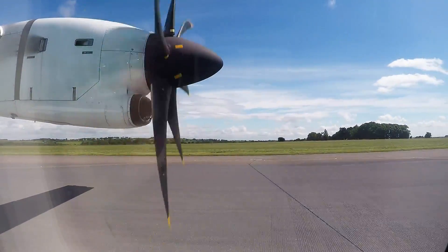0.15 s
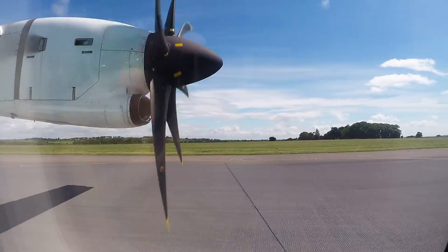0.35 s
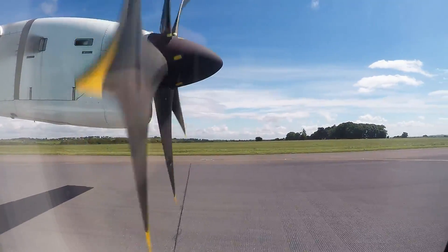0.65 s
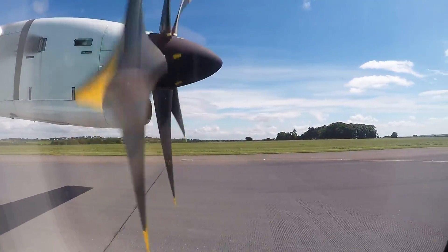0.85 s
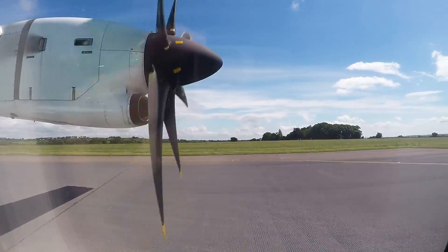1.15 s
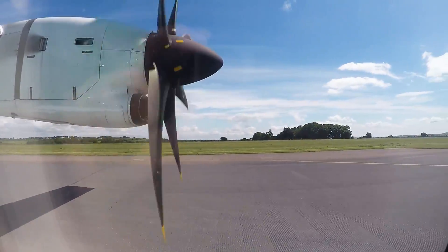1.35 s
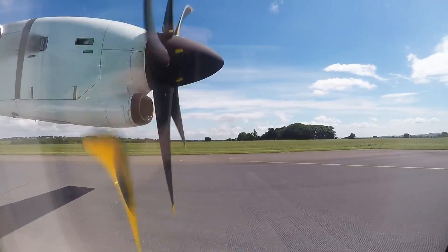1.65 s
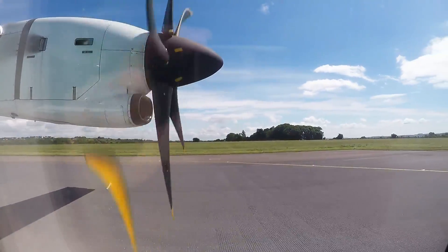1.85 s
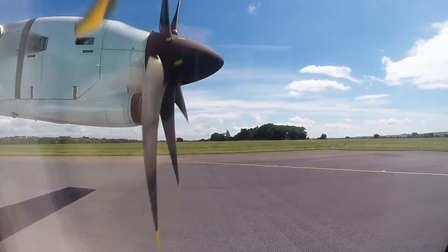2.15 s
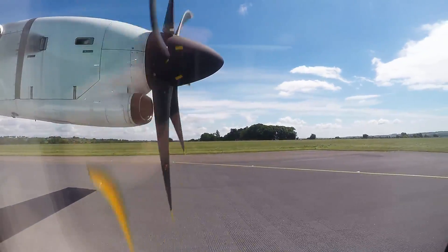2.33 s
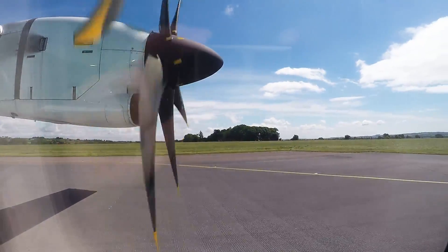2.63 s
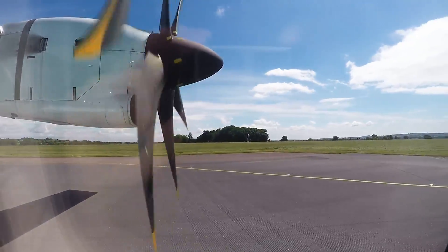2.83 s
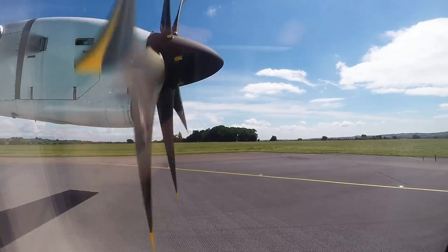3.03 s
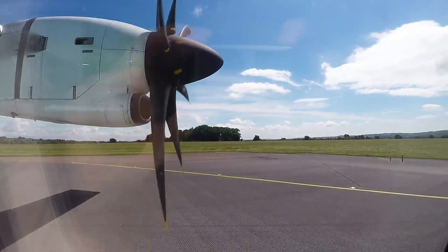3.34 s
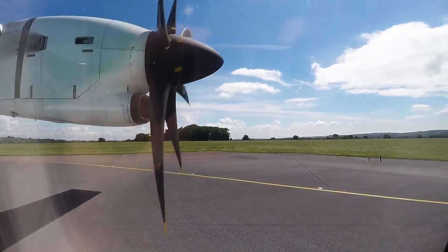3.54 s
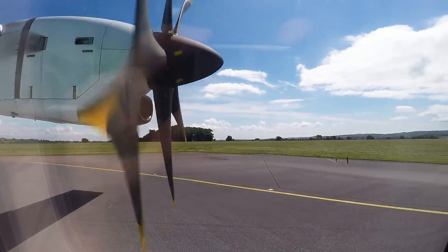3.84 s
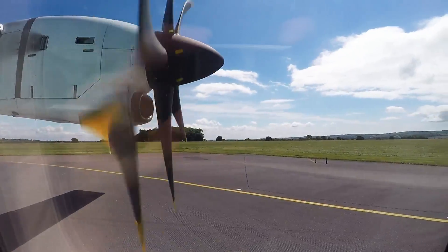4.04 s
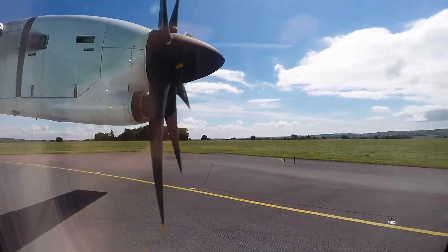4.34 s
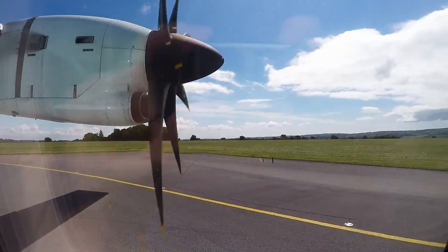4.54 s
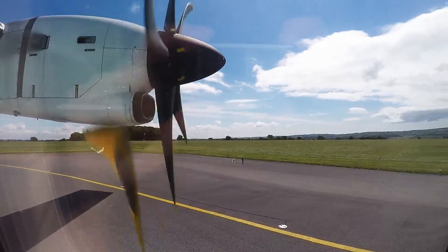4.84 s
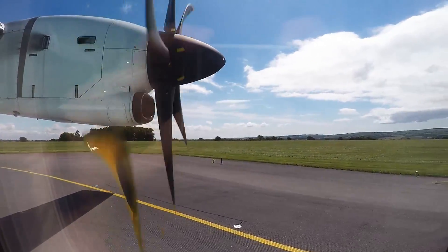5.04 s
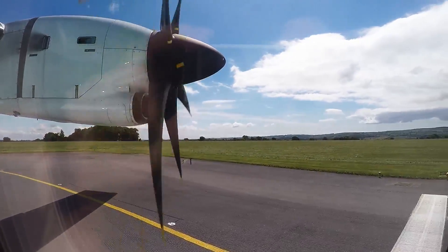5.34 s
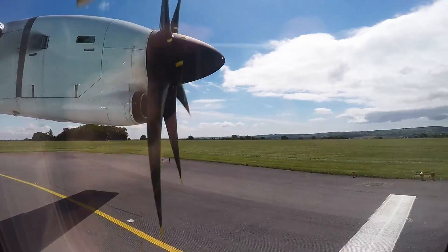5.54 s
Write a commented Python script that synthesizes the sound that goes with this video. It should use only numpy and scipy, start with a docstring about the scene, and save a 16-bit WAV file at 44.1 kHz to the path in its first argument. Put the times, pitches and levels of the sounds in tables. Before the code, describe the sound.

For about 5.7 seconds, the inside of a taxiing turboprop cabin is filled by a loud, continuous, bass-heavy drone. A nearly pure low hum sits under deep boom that surges and drops in irregular quick pulses, while a slightly higher drone wavers in pitch and strength. Propeller blade tones blend in, swelling and blurring. Muffled prop wash roars in the low mids with soft, much quieter air hiss above; it swells around 1.2 s, sags around 1.4 to 1.7 s, then recovers, rising slightly toward the end. A very faint thin turbine whine is almost buried. At about 0.44 s a crisp, ringing little rattle clicks close to the microphone, with a lighter tick at 0.5 s. Weaker ticks and rustles follow near 1.0, 1.3, 1.6, 2.55, 3.3, 3.6, 4.5 and 5.3 s. The sound is mono, enclosed and lightly overloaded, with the engine never stopping.

```python
"""Turboprop cabin at taxi power

Heard beside the six-blade propeller: prop wash booms in the cabin modes, as noise through resonant spectra.
Blade tones and a wavering drone are sines on drifting pitch and level curves, over a steady low hum.
The turbine whines faintly in the air hiss, as two flickering sine lines.
Something light ticks and rustles near the microphone, as short grainy bursts that ring."""
import sys
import numpy as np
from scipy import signal
from scipy.fft import rfft, irfft
from scipy.io import wavfile
from scipy.ndimage import uniform_filter1d

SR = 44100
rng = np.random.default_rng(int(sys.argv[2]) if len(sys.argv) > 2 else 0)


def unload_audio(sound):
    """Save the sound as a 16-bit wav file, at the path given as the first command line argument."""
    columns = np.transpose(np.atleast_2d(sound))
    # keep every value between -1 and 1, then stretch to whole-number steps
    steps = np.round(np.clip(columns, -1, 1) * 32767)
    wavfile.write(sys.argv[1], SR, steps.astype(np.int16))


N = 250488


def gain_of(db):
    """Amplitude factor for a level in dB."""
    return 10 ** (np.asarray(db) / 20)


def evened(x):
    """Scaled to rms 1."""
    return x / np.sqrt(np.mean(x ** 2) + 1e-20)


def add(mix, start_s, sound):
    """Mix a sound in at start_s, cut at the end of the mix."""
    part = mix[round(start_s * SR):][:len(sound)]
    part += sound[:len(part)]


def wander(top_hz, span=20):
    """Random drift of rms 1: sines from top_hz / span to top_hz, weaker with frequency."""
    t = np.arange(0, N / SR + .02, .005)
    drift = 0
    for hz in top_hz * np.geomspace(1 / span, 1, num=24):
        drift = drift + np.sin(2 * np.pi * (hz * t + rng.random())) / np.sqrt(hz)
    return np.interp(np.arange(N) / SR, t, evened(drift))


def coloured(points, modes, size=N, tilt_db=0):
    """Noise of rms 1 under a spectral outline, with resonant bumps and dips; tilt in dB per octave."""
    hz = np.fft.rfftfreq(size, 1 / SR)
    point_hz, point_db = np.transpose(points)
    power = np.ones(len(hz))
    for mode_hz, width_hz, over_db in modes:
        power += (gain_of(over_db) ** 2 - 1) / (1 + (2 * (hz - mode_hz) / width_hz) ** 2)
    tilted_db = point_db + tilt_db * np.log2(point_hz)
    outline_db = np.interp(np.log(hz + 1), np.log(point_hz + 1), tilted_db, left=-300, right=-300)
    response = gain_of(outline_db) * np.sqrt(np.maximum(power, .01))
    return evened(irfft(rfft(rng.standard_normal(size)) * response, size))


def curve(rows, column):
    """One table column interpolated over time."""
    rows = np.array(rows)
    return np.interp(np.arange(N) / SR, rows[:, 0], rows[:, column])


def tone(hz, rms_db):
    """A sine whose phase integrates a pitch curve, under a level curve."""
    phase = np.cumsum(hz) / SR + rng.random()
    return gain_of(rms_db) * np.sqrt(2) * np.sin(2 * np.pi * phase)


# noise outlines, relative: freq_hz, density_db_per_hz
ROAR_OUTLINE = [(140, -32), (190, -5), (215, 0.5), (258, -3.5), (272, -10), (410, -11), (450, -16),
                (700, -19.5), (1200, -26), (1500, -35.5), (2000, -57)]
HISS_OUTLINE = [(710, -26), (1200, -2), (1360, -3), (1780, -6), (2120, -9), (2680, -8.5), (3240, -13.5),
                (4270, -17), (5110, -24), (5570, -23), (7490, -31.5), (12800, -37.5), (15000, -48.5)]
# cabin and panel modes: mode_hz, width_hz, over_noise_db
ROAR_MODES = [(200.5, 15, 0.5), (240, 10, -4), (237.5, 3.7, 4.5), (258, 5.3, 5.5), (302, 7, 1.5),
              (270, 4.3, -4), (318, 13, 3), (338, 9.4, 6.5), (353, 4.2, 1), (411, 55, 2.5), (488, 37, 4),
              (597, 58, 4), (818, 11, 4.5), (911, 42, 3.5), (1167, 44, 4.5)]
HISS_MODES = [(1977, 52, 5), (2188, 140, 5.5), (2648, 48, 5), (3010, 48, 4.9), (3410, 50, 2.8),
              (4660, 270, 2.7), (5450, 83, 5)]
# swell of the prop wash: time_s, swell_db
WASH_SWELL = [(0.0, 1.5), (0.7, 0), (1.2, 3), (1.42, -1.5), (1.7, -2.5), (1.95, 0.5), (3.1, -0.5), (3.6, 0),
              (4.25, 0.3), (4.85, 1.4), (5.68, 1.5)]
ROAR_RMS_DB, HISS_RMS_DB = -25.5, -41.5  # at 0 dB swell
ROAR_DB_PER_SWELL_DB, HISS_DB_PER_SWELL_DB = 0.93, 0.7


def wash():
    """Turbulent air as noise ringing cabin modes: roar and hiss follow one swell and flutter slightly."""
    swell_db = curve(WASH_SWELL, column=1)
    roar_db = ROAR_RMS_DB + ROAR_DB_PER_SWELL_DB * swell_db + .5 * wander(5.9)
    roar = gain_of(roar_db) * coloured(ROAR_OUTLINE, ROAR_MODES)
    hiss_db = HISS_RMS_DB + HISS_DB_PER_SWELL_DB * swell_db + 0.43 * wander(30.)
    hiss = gain_of(hiss_db) * coloured(HISS_OUTLINE, HISS_MODES)
    return roar + hiss


# blade tones of lasting level: multiple, rms_db
BLADE_TONES = [(1, -25), (2, -32), (4, -43)]
# blade tones that come and go: time_s, third_rms_db, fifth_rms_db
OVERTONES = [(0, -28, -33), (.15, -28, -36), (.35, -30, -32.5), (.6, -34, -33), (.88, -36, -33.5),
             (1.0, -37, -39), (1.22, -32, -35), (1.4, -34, -44), (1.75, -31.5, -46), (2.1, -34, -48),
             (2.4, -39, -48), (3.3, -36, -46), (4.1, -39, -46), (4.35, -33, -39), (4.7, -31.5, -42),
             (5.0, -34, -44), (5.2, -33, -35), (5.5, -35, -36), (5.68, -35, -38)]
BLADE_HZ = 84.8  # mean blade-pass rate, six per turn


def propeller():
    """Multiples of a slightly wandering blade-pass rate, each swelling and blurring as the loading shifts."""
    blade_hz = BLADE_HZ * (1 + 0.0025 * wander(1.5))
    tones = np.zeros(N)
    for multiple, rms_db in BLADE_TONES:
        tones += tone(multiple * (blade_hz + 0.4 * wander(6.)), rms_db + 3.2 * wander(5.4))
    third_hz = 3 * blade_hz + 2.5 * wander(8.)
    third = tone(third_hz, curve(OVERTONES, column=1) + 3 * wander(12., span=6))
    fifth_hz = 5 * blade_hz + 1.8 * wander(10.)
    fifth = tone(fifth_hz, curve(OVERTONES, column=2) + 2.8 * wander(14., span=6))
    return tones + third + fifth


# boom outline, relative: freq_hz, density_db_per_hz
BOOM_OUTLINE = [(12, -48.5), (24, -9.5), (40, -6.5), (60, -6), (90, -11), (101, -7), (112, -4.5),
                (140, -13), (150, -13), (190, -22.5), (230, -47)]
# cabin modes: mode_hz, width_hz, over_noise_db
BOOM_MODES = [(41.6, 3, 1.5), (63.6, 14, 6.5), (107, 7.7, -8.5), (108.5, 11, 5.5), (121, 15, -7),
              (142, 11, 5.5), (184, 20, 6)]
# boom and hum together: time_s, rms_db
RUMBLE_LEVEL = [(0.0, -16), (0.16, -12.5), (0.19, -24), (0.22, -15.5), (1.27, -14), (1.3, -10.5),
                (1.44, -18), (1.52, -13.5), (1.57, -23), (1.6, -21), (2.02, -15), (2.06, -27), (2.15, -9),
                (2.2, -22), (2.24, -17), (3.07, -15.5), (3.08, -36), (3.13, -17.5), (3.46, -13),
                (3.51, -19), (3.69, -12), (3.73, -23), (3.86, -12.5), (4.0, -22), (4.03, -17), (4.4, -18.5),
                (4.49, -10.5), (4.51, -17.5), (5.11, -16), (5.68, -17)]
# strongest cabin drone: time_s, pitch_hz, rms_db
DRONE = [(0.0, 136, -14), (0.08, 130.6, -38), (0.11, 122.3, -15), (0.24, 127, -17.5), (0.43, 132.4, -18.5),
         (0.49, 127.4, -14), (0.58, 126.5, -37), (0.6, 124.4, -16), (0.79, 124.8, -23), (0.88, 119.2, -19),
         (0.96, 128.6, -15.5), (1.11, 130.5, -18.5), (1.23, 129.2, -13), (1.28, 125.4, -25.5),
         (1.37, 128.4, -15), (1.41, 126, -25), (1.45, 126.5, -18), (1.61, 125.1, -25.5), (1.66, 127.6, -9),
         (1.79, 129.1, -42), (1.8, 127.1, -8), (1.87, 128.3, -28), (1.94, 126, -9), (2.06, 122.8, -27.5),
         (2.14, 132.2, -34), (2.18, 130.2, -12), (2.36, 130, -19.5), (2.4, 126.5, -14),
         (2.55, 119.4, -30.5), (2.59, 121.7, -9), (2.66, 125.9, -23), (2.69, 125.8, -14.5),
         (2.74, 128.4, -21), (2.97, 128.4, -16.5), (2.99, 130.8, -27), (3.08, 129.9, -16),
         (3.15, 128.8, -23), (3.18, 122.2, -11.5), (3.24, 123, -16), (3.34, 130.2, -21), (3.39, 128.7, -12),
         (3.45, 130.5, -17), (3.56, 126.1, -12.5), (3.57, 126.7, -30.5), (3.65, 127.3, -17.5),
         (3.86, 126.7, -21), (3.94, 125.5, -12), (3.99, 125, -29.5), (4.02, 124, -10), (4.06, 126.7, -24.5),
         (4.35, 130.7, -14), (4.6, 116.9, -23.5), (4.68, 129.6, -13.5), (4.78, 129, -15),
         (4.86, 125.2, -14.5), (5.19, 126.6, -23), (5.35, 132.1, -17.5), (5.38, 132.5, -29.5),
         (5.44, 128.2, -12.5), (5.68, 128.6, -19)]
HUM_HZ, HUM_RE_BOOM_DB = 50.45, -6


def hum():
    """Surging boom noise holding a nearly pure low tone, under a drone wavering in pitch and level."""
    low_tone = tone(HUM_HZ * (1 + 0.0021 * wander(1.4)), HUM_RE_BOOM_DB + 0.87 * wander(1.5))
    boom = coloured(BOOM_OUTLINE, BOOM_MODES)
    rumble = gain_of(curve(RUMBLE_LEVEL, column=1)) * evened(boom + low_tone)
    drone_hz = curve(DRONE, column=1) + 0.8 * wander(13.0, span=2.9)
    drone = tone(drone_hz, curve(DRONE, column=2) + 1.7 * wander(20.0, span=2.9))
    return rumble + drone


# turbine whine: time_s, pitch_hz, rms_db
WHINE = [(0, 4140, -70), (.6, 4138, -66), (2.3, 4140, -66), (2.7, 4185, -71), (4.2, 4195, -70),
         (4.6, 4150, -75), (5.2, 4090, -72), (5.68, 4085, -69)]
HIGH_WHINE_HZ, HIGH_WHINE_RMS_DB = 8310, -82


def turbine():
    """A thin line that shifts slowly and flickers, and a fainter, fuzzier one above."""
    whine_hz = curve(WHINE, column=1) + 3 * wander(15.)
    whine = tone(whine_hz, curve(WHINE, column=2) + 2.5 * wander(20., span=6))
    high_hz = HIGH_WHINE_HZ + 10 * wander(15.)
    return whine + tone(high_hz, HIGH_WHINE_RMS_DB + 2.5 * wander(9.))


# ticks and rustles: start_s, level_db, t60_s, tilt_db_per_octave, ringing (0-1), top_hz
TICKS = [(0.4405, -28, 0.035, -7, .6, 5000), (0.4420, -33, 0.13, 2.5, .5, 15000),
         (0.4430, -25, 0.035, -4, 0.8, 15000), (0.4463, -25.5, 0.03, -2, .8, 15000),
         (0.4492, -26, 0.035, -5, .8, 12000), (0.4540, -27.5, 0.045, -3, 0.6, 15000),
         (0.4608, -33, 0.05, -3, .5, 15000), (.5138, -36, 0.03, -.5, 0.3, 15000),
         (.5185, -41, 0.06, 1, 0.3, 15000), (1.0163, -40.5, .04, 1, .25, 15000),
         (1.0213, -44, 0.068, 3, .4, 15000), (1.172, -50, .12, 3, .2, 13500),
         (1.314, -32.5, .05, -7, 0.2, 9000), (1.333, -40, .05, -1.5, 0.1, 12000),
         (1.604, -41.5, .07, -0.5, .25, 14000), (1.61, -42, .08, 2, .25, 14000),
         (1.6191, -45, .09, 2, 0.3, 14000), (1.641, -48, .09, 0.5, .25, 14000),
         (2.5525, -31, .03, -9, .25, 5000), (2.775, -54, 0.12, 3, .4, 10000),
         (3.125, -54, .14, 3, .4, 10000), (3.34, -43, 0.047, -0.5, 0.2, 15000),
         (3.567, -37, 0.073, -5, 0.24, 8000), (3.8886, -47, 0.035, 4, .25, 11500),
         (4.4893, -44, .05, -2, 0.22, 8500), (4.657, -45, 0.044, 0.5, 0.3, 10500),
         (5.3097, -33, 0.048, -3.5, 0.22, 12000)]
# modes of the small object: mode_hz, width_hz, over_noise_db (at full ringing)
TICK_MODES = [(700, 120, 10), (1350, 150, 7), (1880, 120, 11), (2770, 120, 11), (3120, 100, 10),
              (4530, 80, 5), (5690, 80, 6), (7475, 90, 12), (9230, 70, 8), (10500, 90, 5), (11250, 80, 6),
              (11680, 90, 4), (14200, 80, 5)]
# burst outline before tilt, relative: freq_hz, density_db_per_hz
TICK_OUTLINE = [(400, -15), (800, 8), (1500, 1), (3000, 3.5), (5000, -2.5), (8000, -12.5), (12000, -14),
                (15500, -19.5)]
RISE_T60S, HOLD_T60S = 0.015, 0.07  # rise and contact times as shares of t60_s
CONTACTS_PER_S, GRAIN_DB = 900, 3
RING_DB, RING_T60_S = -23, 0.06  # free ringing, before mode levels and ringing
RING_TILT_DB_PER_OCTAVE = -14  # above the strongest mode


def ticks():
    """Bursts of tiny random contacts as grainy noise, ringing the same small object more or less."""
    out = np.zeros(N)
    t = np.arange(8192) / SR
    strongest_hz = max(TICK_MODES, key=lambda mode: mode[-1])[0]
    for start_s, level_db, t60_s, tilt_db, ringing, top_hz in TICKS:
        rise = np.minimum(t / (RISE_T60S * t60_s), 1)
        decay = gain_of(-60 * np.maximum(t / t60_s - HOLD_T60S, 0))

        contacts = (rng.random(len(t)) < CONTACTS_PER_S / SR) * rng.exponential(1, len(t))
        bumps = signal.lfilter([1], [1, -np.exp(-CONTACTS_PER_S * 2 / SR)], contacts)
        crackle = gain_of(GRAIN_DB * np.clip(evened(bumps) - 1, -1, 2))

        modes = [(hz, width_hz, over_db * ringing) for hz, width_hz, over_db in TICK_MODES]
        noise = coloured(TICK_OUTLINE, modes, size=len(t), tilt_db=tilt_db)
        lowpass = signal.butter(3, top_hz, fs=SR, output="sos")
        burst = signal.sosfilt(lowpass, rise * decay * crackle * noise)

        ring = np.zeros(len(t))
        for hz, _, over_db in TICK_MODES:
            octaves_above = max(np.log2(hz / strongest_hz), 0)
            mode_gain = gain_of(over_db + RING_TILT_DB_PER_OCTAVE * octaves_above)
            ring += mode_gain * np.sin(2 * np.pi * (hz * t + rng.random()))
        ring *= ringing ** 2 * rise * gain_of(RING_DB - 60 * t / RING_T60_S)
        add(out, start_s, gain_of(level_db) * (burst + ring))
    return out


def scene():
    """All sources summed to one channel."""
    return (wash() + propeller() + hum() + turbine() + ticks())[None]


CEILING = 1.1  # full-scale amplitude of the soft overload
EDGE_HZ = 15260  # band limit
THRESHOLD_DB, DUCK_DB_PER_DB, TRIM_DB = -6.5, -0.072, -0.06


def record(dry):
    """Gain control leans on loud swells, the microphone overloads softly, then the band is limited."""
    power_db = 10 * np.log10(abs(uniform_filter1d(dry[0] ** 2, 1500)) + 1e-12)
    over_db = np.maximum(power_db - THRESHOLD_DB, 0)
    ducked = dry * gain_of(TRIM_DB + DUCK_DB_PER_DB * uniform_filter1d(over_db, 600))
    rounded = CEILING * np.tanh(ducked / CEILING)
    samples_to_end = np.minimum(np.arange(N), np.arange(N)[::-1])
    faded = rounded * np.minimum(samples_to_end / (.004 * SR), 1)  # 4 ms against end clicks
    padded = np.pad(faded, ((0, 0), (255, 255)), "reflect", reflect_type="odd")
    lowpass = signal.firwin(511, EDGE_HZ, window=("kaiser", 9), fs=SR)
    return signal.oaconvolve(padded, lowpass[None], "valid")


dry = scene()
out = record(dry)
unload_audio(out)
```